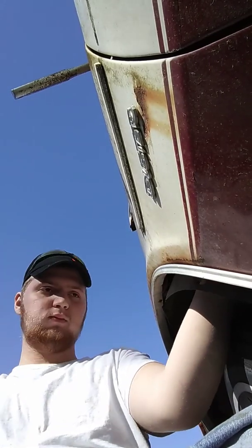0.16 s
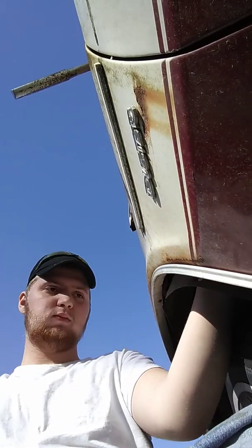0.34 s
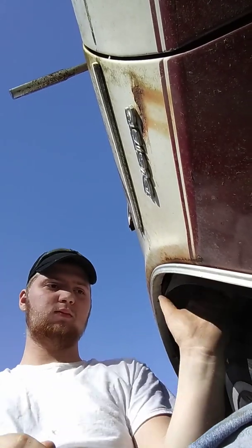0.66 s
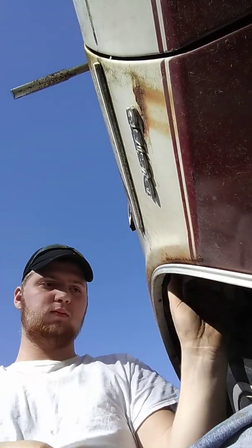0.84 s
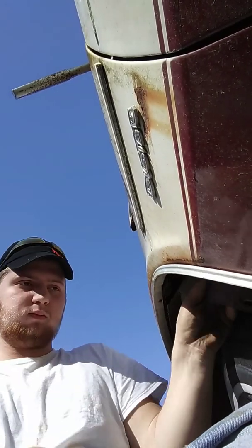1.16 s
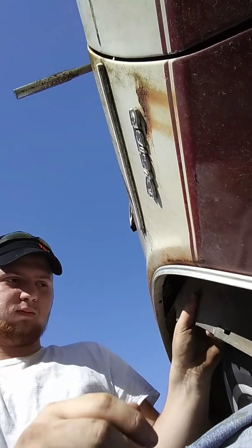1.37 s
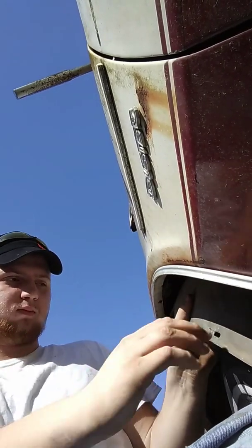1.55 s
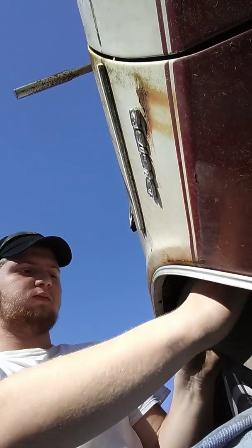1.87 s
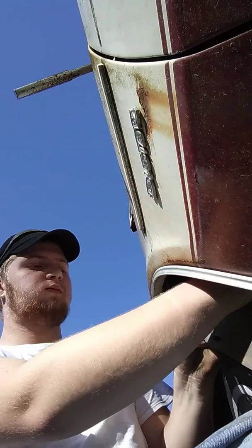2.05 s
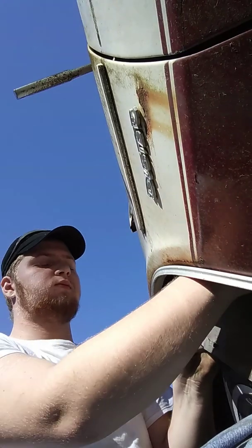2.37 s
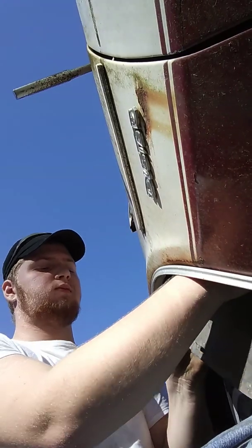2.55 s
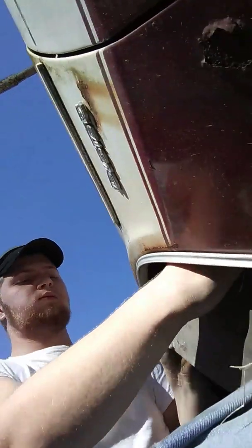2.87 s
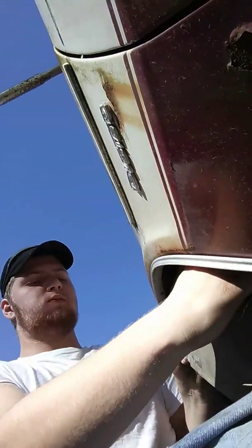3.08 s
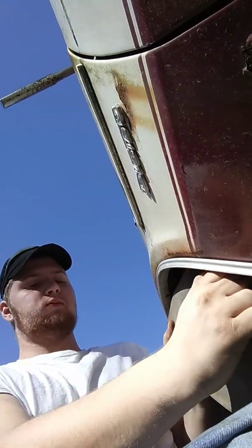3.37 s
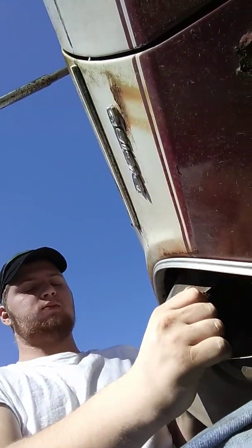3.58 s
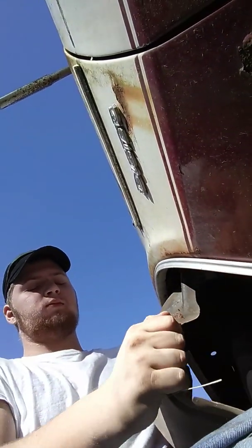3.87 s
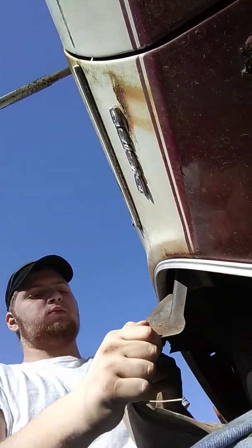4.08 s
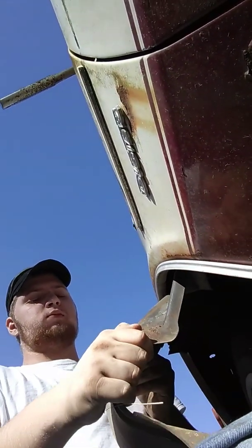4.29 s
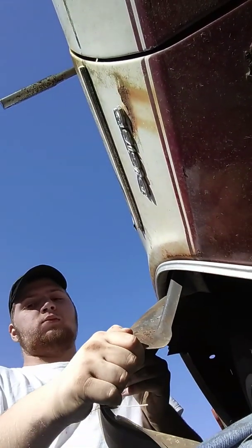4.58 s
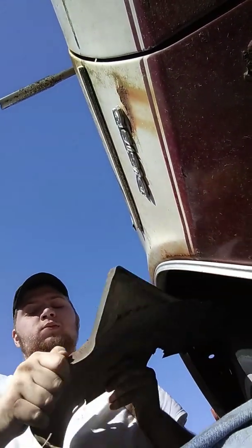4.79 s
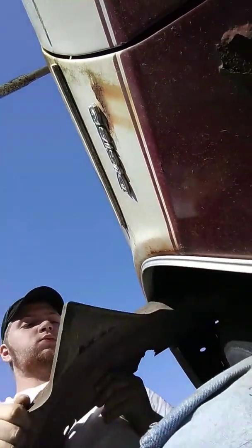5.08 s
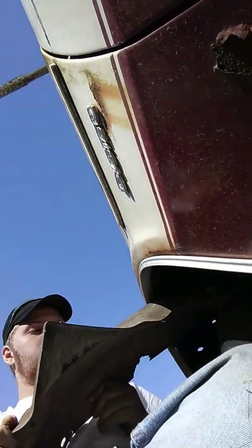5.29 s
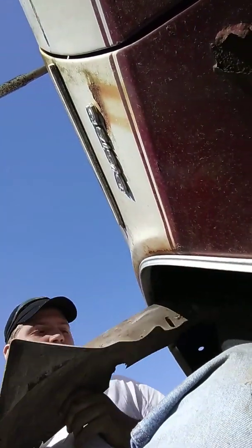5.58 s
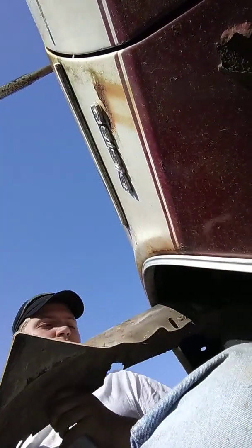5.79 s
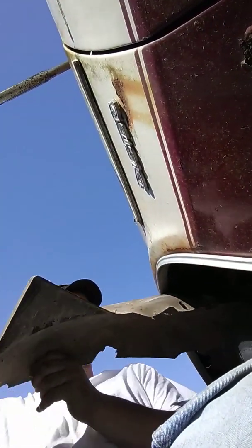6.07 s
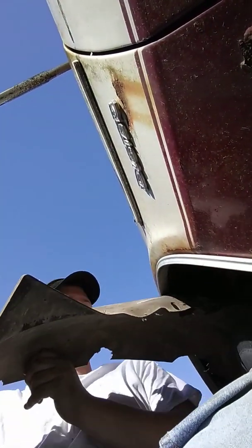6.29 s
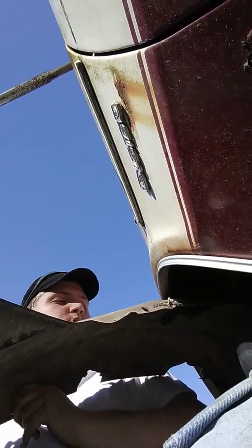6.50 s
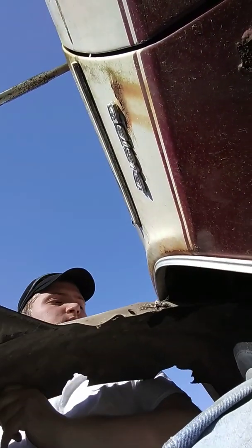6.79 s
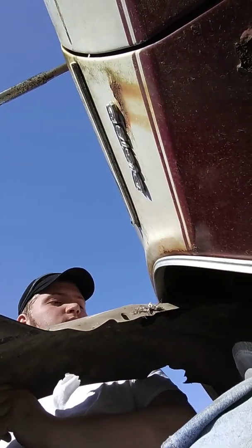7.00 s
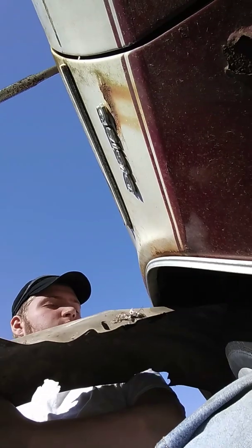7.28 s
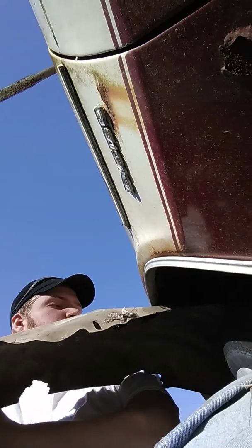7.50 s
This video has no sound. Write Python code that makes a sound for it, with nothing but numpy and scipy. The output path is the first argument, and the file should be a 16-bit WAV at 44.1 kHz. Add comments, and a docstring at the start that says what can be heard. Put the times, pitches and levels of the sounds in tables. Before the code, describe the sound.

Close to the microphone outdoors, a plastic wheel-well liner rubs and bumps softly against a steel fender. Scraping strengthens, with a sharp knock cluster and bright grit ticks, then heavy hollow thuds as it pulls loose. Its edge squawks and judders in a quick stutter, a few solid knocks follow, and dry, slightly whistling rubs finish over faint outdoor air.

```python
"""A plastic wheel-well liner, worked loose and dragged out of a car, knocks on the steel fender close by.
Blows excite damped modes of the sheet; sliding friction drives it with many tiny catches.
Its edge grinds, squawks and judders by stick-slip, whines and clangs sound at single pitches, and grit ticks.
A faint outdoor background lies beneath, and the hardest blows overload the input stage."""
import sys
import numpy as np
from scipy import signal
from scipy.io import wavfile
from scipy.ndimage import uniform_filter1d

SR = 44100
rng = np.random.default_rng(int(sys.argv[2]) if len(sys.argv) > 2 else 0)


def unload_audio(sound):
    """Save the sound as a 16-bit wav file, at the path given as the first command line argument."""
    columns = np.transpose(np.atleast_2d(sound))
    # keep every value between -1 and 1, then stretch to whole-number steps
    steps = np.round(np.clip(columns, -1, 1) * 32767)
    wavfile.write(sys.argv[1], SR, steps.astype(np.int16))


N = 337365

HZ = np.fft.rfftfreq(8192, 1 / SR)  # frequency grid of all responses
EDGE_PIVOT_HZ = 2110  # an edge pitched below it mainly clacks, one above it mainly cracks


def amp(db):
    """Level in decibels to amplitude ratio."""
    return 10 ** (np.asarray(db) / 20)


def evened(x):
    """Normalization to rms 1."""
    return x / np.sqrt(np.mean(x ** 2) + 1e-20)


def read(points):
    """Spectrum by interpolation over log frequency, as gains on the frequency grid."""
    hz, db = np.transpose(points)
    return amp(np.interp(np.log(HZ + 1), np.log(hz), db))


def add(mix, s, sound):
    """Superposition: adds a sound to the mix from time s, cut at the end of the mix."""
    part = mix[round(s * SR):][:len(sound)]
    part += sound[:len(part)]


def causal(gain):
    """Minimum-phase impulse response of energy 1: the log gain fixes the phase by a Hilbert transform."""
    log_gain = np.log(np.maximum(gain / gain.max(), 1e-5))
    circle = np.concatenate([log_gain, log_gain[-2:0:-1]])
    spectrum = np.exp(np.conj(signal.hilbert(circle)))
    taps = np.fft.ifft(spectrum).real[:len(HZ)]
    return taps / np.linalg.norm(taps)


def wander(size, rate_hz):
    """Slow random fluctuation of rms 1, interpolated between rate_hz random values a second."""
    knots = np.arange(size) * rate_hz / SR
    return evened(np.interp(knots, np.arange(size), rng.standard_normal(size)))


def sheet(colour, between_db=-1):
    """Modal superposition: strong modes stand out of a dense mass of weaker ones."""
    # resonances of the sheet and its stiff edge: [f/Hz, full width/Hz, level/dB before the colour]
    modes = [(228.2, 15, 6), (280.8, 20, 4), (364.6, 23, 3.5), (442, 16, 4), (556, 14, -1.5),
             (634.5, 50, 1.5), (800, 150, -2.5), (1310, 25, -1.5), (1865, 115, -2.5), (2310, 61, -2),
             (2430, 38, -9.5), (3250, 29, 0.5), (3860, 280, -5.5), (4730, 30, 1), (9650, 600, -2)]
    peaks = sum(amp(db) ** 2 / (1 + (2 * (HZ - hz) / width) ** 2) for hz, width, db in modes)
    return read(colour) * np.sqrt(amp(between_db) ** 2 + peaks)


def registers():
    """Band division of the sheet's response, from broad bending (thump) up to its surface (fizz)."""
    # colour of blows and of sliding: [f/Hz, relative level/dB per Hz]
    colour = [(40, -66), (110, -30), (170, -10), (230, -3), (400, 3), (650, -1), (1000, -7), (2000, -10),
              (4300, -8.5), (5800, -23.5), (8200, -32), (10500, -30), (15500, -34.5)]
    # borders between thump, clack, crack and fizz: [f/Hz]
    borders_hz = [869, 2370, 6540]
    below = [0] + [1 / (1 + (HZ / hz) ** 12) for hz in borders_hz] + [1]
    gain = sheet(colour)
    return [causal(gain * np.sqrt(abs(b - a))) for a, b in zip(below, below[1:])]


def narrow_peaks(rows):
    """Sum of peak powers, with dark valleys between them; a width is the half width at -6 dB."""
    power = sum(amp(db) ** 2 / (1 + ((HZ - hz) / width) ** 2) ** 2 for hz, width, db in rows)
    return causal(np.sqrt(power))


def asperities(size, per_s, spread_db, smooth):
    """Asperity friction: sparse random catches of uneven size over a smooth hiss."""
    sizes = amp(spread_db * np.minimum(rng.exponential(1, size), 4)) * rng.choice([-1, 1], size)
    catches = evened(sizes * (rng.random(size) < per_s / SR))
    return evened(catches + smooth * rng.standard_normal(size))


def crackle(size, per_s, spread_db, cycles, count=22):
    """Local resonance under coarse friction: catches ring spots of the surface, each at its own pitch."""
    out = np.zeros(size)
    for hz in np.geomspace(800, 15000, count):
        # the amplitude falls by a factor e in the given number of cycles
        radius, turn = np.exp(-hz / (cycles * SR)), 2 * np.pi * hz / SR
        catches = asperities(size, per_s / count * np.sqrt(hz / EDGE_PIVOT_HZ), spread_db, 0)
        spot = signal.lfilter([1, 0, -1], [1, -2 * radius * np.cos(turn), radius ** 2], catches)
        out += np.sqrt(hz) * evened(spot)
    return evened(out)


def struck(force, response):
    """Forced response by convolution, with rms 1 over its first 14 ms."""
    sound = signal.fftconvolve(force, response)[:len(force)]
    return sound / np.sqrt(np.mean(sound[:round(.014 * SR)] ** 2))


def ring(t, hz, rise_s, fall_s):
    """Damped oscillation of one mode, with rms 1 over its first 14 ms."""
    phase = 2 * np.pi * np.cumsum(hz * np.ones(len(t))) / SR
    envelope = np.exp(-t / fall_s) * (1 - np.exp(-t / rise_s))
    return struck(np.sin(phase) * envelope, [1])


def rattle(t, ring_s, well_db, well_s):
    """Contact force as decaying noise: a short burst, then reflections inside the wheel well."""
    burst = np.exp(-t / ring_s) + amp(well_db) * np.exp(-t / well_s)
    return burst * (1 - np.exp(-t / 0.00032)) * rng.standard_normal(len(t))


def air(level_db=-57.5):
    """Stationary filtered noise: a faint outdoor background."""
    # its colour: [f/Hz, relative level/dB per Hz]
    air_colour = [(50, -12), (250, 22), (700, 1), (1500, -9), (4500, -3), (9000, -23)]
    return amp(level_db) * signal.oaconvolve(rng.standard_normal(N), causal(read(air_colour)))[:N]


def sheen(uneven_db=2):
    """Narrow-band filtering: late rubs carry a thin, uneven, airy whistle in a few narrow high bands."""
    # the narrow bands: [f/Hz, half width/Hz, relative level/dB]
    high_bands = [(6320, 130, -2), (7060, 150, -2), (9000, 190, 1.5), (9460, 150, -3)]
    # strength of the noise, silent outside these times: [t/s, level/dB before the unevenness]
    level_curve = [(6.5, -72), (6.62, -59), (7.03, -59), (7.09, -66), (7.16, -55), (7.54, -55), (7.58, -74)]
    t = np.arange(N) / SR
    level_db = np.interp(t, *np.transpose(level_curve), left=-np.inf, right=-np.inf)
    noise = amp(level_db + uneven_db * wander(N, 20)) * rng.standard_normal(N)
    return signal.oaconvolve(noise, narrow_peaks(high_bands))[:N]


def whines(width_hz=110):
    """Resonant filtering: friction noise feeds one narrow mode, a rough, short whistle."""
    out = np.zeros(N)
    # friction holds one mode singing: [start t/s, end t/s, f/Hz, level/dB]
    whine_rows = [(0.268, 0.337, 1490, -49), (.81, 0.88, 4700, -53), (0.807, 0.88, 3480, -52),
                  (0.82, 0.88, 740, -41), (5.178, 5.215, 1580, -23.5), (5.497, 5.55, 1290, -19),
                  (7.275, 7.37, 2200, -37)]
    for start, end, hz, db in whine_rows:
        size = round((end - start) * SR)
        force = rng.standard_normal(size) * signal.windows.tukey(size, .5)
        sound = signal.fftconvolve(force, causal(1 / (1 + ((HZ - hz) / width_hz) ** 2)))
        add(out, start, amp(db) * sound / np.sqrt(np.mean(sound[:size] ** 2)))
    return out


def grit(low_hz=3200):
    """Impulsive release: single grains snap off as bright ticks that hardly ring."""
    out, t = np.zeros(N), np.arange(SR // 25) / SR
    response = causal(HZ ** 2 / (HZ ** 2 + low_hz ** 2))
    # grit snaps off the sheet: [t/s, peak level/dB]
    snap_rows = [(.9015, -27), (2.464, -15), (2.8144, -6), (2.754, -18), (2.877, -17), (2.943, -16),
                 (3.051, -24), (3.179, -20), (3.23, -21), (3.344, -23), (3.694, -23), (3.971, -7),
                 (4.034, -21.5), (4.4, -22), (4.528, -24), (5.05, -21), (5.121, -23), (5.2817, -13),
                 (5.666, -27)]
    for s, db in snap_rows:
        tick = signal.fftconvolve(rattle(t, 0.00096, -28, 0.011), response)
        add(out, s, amp(db) * tick / abs(tick).max())
    return out


def clangs(sharp_share=0.08, settle_s=0.008, chatter_share=0.035):
    """Damped mode of gliding pitch: the fender starts sharp, settles and chatters against the sheet."""
    out, t = np.zeros(N), np.arange(SR // 4) / SR
    # a square hit leaves the steel fender ringing: [t/s, settled f/Hz, level/dB, decay/s]
    clang_rows = [(2.578, 1290, -15, 0.011), (1.492, 2380, -32, 0.012)]
    for s, hz, db, decay_s in clang_rows:
        pitch = hz * (1 + sharp_share * np.exp(-t / settle_s) + chatter_share * wander(len(t), 800))
        add(out, s, amp(db) * ring(t, pitch, 0.003, decay_s))
    return out


def squawks(rough=0.75):
    """Stick-slip excitation: fast, uneven pulses ring the resonances of the bent edge."""
    # resonances of the edge while it is bent: [f/Hz, half width/Hz, relative level/dB]
    bent_modes = [(690, 380, 0), (1570, 190, 2), (2640, 380, -1), (3580, 200, -9), (4250, 350, -16)]
    # one curve for each squawk: [t/s, mean slip rate f/Hz, level/dB]
    squawk_curves = [
        [(5.047, 820, -32), (5.052, 850, -16.5), (5.069, 830, -17), (5.08, 750, -14.5), (5.092, 640, -28),
         (5.104, 780, -26.5), (5.114, 780, -42)],
        [(5.178, 780, -38), (5.188, 790, -17.5), (5.198, 800, -25), (5.222, 800, -23), (5.248, 780, -28)],
    ]
    out, response = np.zeros(N), narrow_peaks(bent_modes)
    for curve in squawk_curves:
        s, rate, db = np.transpose(curve)
        t = np.arange(s[0], s[-1], 1 / SR)
        turns = np.cumsum(np.interp(t, s, rate) * (1 + .065 * wander(len(t), 700))) / SR
        harmonics = sum(np.cos(2 * np.pi * k * turns) for k in range(1, 8))
        pulses = evened(harmonics * amp(2.1 * wander(len(t), 353)))
        force = pulses + rough * rng.standard_normal(len(t))
        sound = signal.fftconvolve(force, response)[:len(t)]
        add(out, s[0], evened(sound) * amp(np.interp(t, s, db)))
    return out


def judder(count=8, start_s=5.5178, gap_s=0.0081, start_db=-10, fade_db_per_s=194):
    """Regular stick-slip: evenly spaced slips weaken as the edge runs free, in rows [t/s, level/dB]."""
    return [(start_s + s, start_db - fade_db_per_s * s) for s in np.arange(count) * gap_s]


def slips(snap_hz=2600, edge_hz=1270, sweep_s=0.001097, ring_s=0.0051, bend_share=0.44, sheet_share=0.53):
    """Dispersion: each slip sends a bending wave along the edge, whose high part arrives first."""
    out, t = np.zeros(N), np.arange(SR // 6) / SR
    # colour of a slip: [f/Hz, relative level/dB per Hz]
    slip_colour = [(60, -45), (200, -19.5), (400, -5), (900, -0.5), (1300, -0.5), (1700, -5.5),
                   (2400, -5.5), (3200, -13.5), (4600, -19), (6000, -33), (15000, -40)]
    # the bent edge sticks and jumps: [t/s, level/dB before the two shares]
    slip_rows = [(5.203, -17.5), (5.2504, -11.5), (5.2917, -11.5), (5.3376, -10.5), (5.4366, -8.5),
                 (5.478, -8.5), (5.503, -7)]
    response = causal(sheet(slip_colour))
    for s, db in slip_rows + judder():
        hz = edge_hz * (1 + 0.039 * rng.standard_normal()) + snap_hz * np.exp(-t / sweep_s)
        body = struck(rattle(t, ring_s, -10.5, 0.021), response)
        add(out, s, amp(db) * (bend_share * ring(t, hz, 0.0013, ring_s) + sheet_share * body))
    return out


def grinds(responses, fade_db=8.5, fizz_db=-10):
    """Forced vibration: coarse catches drive the whole sheet; edge noise fades as the pressure lets go."""
    out = np.zeros(N)
    # the edge grinds over steel, its tilt leaning towards crack and fizz:
    # [start t/s, end t/s, thump level/dB, clack level at the start/dB, tilt/dB per register]
    grind_rows = [(0.87, 0.938, -22.5, -28.5, -7), (1.14, 1.202, -24, -36, -5),
                  (1.478, 1.507, -17.5, -27, -0.5), (2.322, 2.345, -25, -30, -3),
                  (3.812, 3.9, -13.5, -23, 1), (4.672, 4.822, -14.5, -22.5, -8),
                  (4.704, 4.774, -42, -18, -2.5), (5.198, 5.246, -31, -35, 2)]
    for start, end, thump_db, clack_db, tilt_db in grind_rows:
        size = round((end - start) * SR)
        push = asperities(size, per_s=700, spread_db=2.5, smooth=0.67)
        crunch = evened(.6 * push + crackle(size, per_s=2400, spread_db=3, cycles=3))
        edge_db = clack_db - fade_db * np.linspace(0, 1, size)
        levels_db = thump_db, edge_db, edge_db + tilt_db, edge_db + 2 * tilt_db + fizz_db
        window = signal.windows.tukey(size, .08)
        for force, db, response in zip([push, crunch, crunch, crunch], levels_db, responses):
            add(out, start, signal.fftconvolve(force * window * amp(db), response))
    return out


def strokes(swell_db=8.5, curve=1.24, ramp_s=0.027, lean_weight_db=2.5, lean_dirt_db=-12.5):
    """Speed-dependent friction: rumble, rasp and fizz swell as each stroke speeds up, then slacken."""
    # between strokes the sheet still leans on the fender and creeps: [t/s, rasp level/dB]
    lean_curve = [(0.7, -57.5), (1.1, -49.5), (1.85, -56.5), (2.1, -57), (2.7, -44), (3.95, -42.5),
                  (4.3, -51), (4.6, -52), (5.0, -37), (5.4, -41.5), (5.75, -51), (7.6, -54)]
    # one push or pull of the sheet, with its weight (rumble) and dirt (fizz), before pressure and shares:
    # [start t/s, fastest t/s, end t/s, rasp level/dB, rumble over rasp/dB, fizz over rasp/dB]
    stroke_rows = [(0.0, -0.005, 0.093, -42.5, 7.5, -12.5), (0.134, 0.17, 0.23, -46.5, 5, -10),
                   (0.25, 0.295, 0.43, -44, -3.5, -12.5), (0.56, 0.59, 0.68, -52, 3, -12),
                   (0.803, 0.84, 0.87, -42.5, 6.5, -4), (0.856, 0.93, 1.076, -38.5, 9.5, -11.5),
                   (1.129, 1.226, 1.3, -40.5, 11, -11.5), (1.287, 1.49, 1.575, -37.5, 7.5, -16),
                   (1.57, 1.64, 1.73, -46.5, 10, -9), (1.73, 1.76, 1.9, -49.5, 1.5, -4.5),
                   (1.887, 1.945, 2.07, -40, -4.5, -10.5), (2.1, 2.222, 2.35, -40.5, -1, -7),
                   (2.31, 2.4, 2.44, -38, 4, -10.5), (2.451, 2.557, 2.75, -34, 3, -11.5),
                   (2.709, 2.793, 2.933, -23, -3, -8.5), (2.87, 3.022, 3.14, -34.5, 5, -9),
                   (3.13, 3.237, 3.43, -34.5, -9, -9.5), (3.41, 3.542, 3.62, -29, 5.5, -11),
                   (3.634, 3.684, 3.78, -29.5, 2, -12), (3.75, 3.852, 4.13, -30, 6, -12.5),
                   (4.08, 4.16, 4.3, -39, 2.5, -10), (4.308, 4.35, 4.44, -40, 4.5, -12),
                   (4.509, 4.555, 4.67, -41, 7.5, -14), (4.659, 4.78, 4.85, -28, 6, -14),
                   (4.885, 4.92, 5.05, -29.5, 5, -11), (5.15, 5.273, 5.4, -32.5, 8, -15),
                   (5.406, 5.545, 5.58, -27, 7, -13.5), (5.554, 5.577, 5.85, -43, 14, -16.5),
                   (5.82, 6.068, 6.33, -38.5, -1, -11), (6.11, 6.214, 6.24, -38, 13, -20),
                   (6.312, 6.416, 6.485, -32.5, 8.5, -10.5), (6.547, 6.673, 6.83, -38, 6, -13.5),
                   (6.81, 6.97, 7.12, -39.5, 11, -16), (7.102, 7.164, 7.33, -35.5, 4, -13),
                   (7.232, 7.33, 7.56, -35, 6.5, -13), (7.597, 7.647, 7.67, -45.5, 5, -14)]
    t = np.arange(N) / SR
    lean = amp(np.interp(t, *np.transpose(lean_curve)))
    power = (amp([[lean_weight_db], [0], [lean_dirt_db]]) * lean) ** 2
    for start, fastest, end, rasp_db, weight_db, dirt_db in stroke_rows:
        on = (t > start - ramp_s / 2) & (t < end + ramp_s / 2)
        slack = np.interp(t[on], [start, fastest, end], [1, 0, 1]) ** curve
        contact = np.clip(np.minimum(t[on] - start, end - t[on]) / ramp_s + .5, 0, 1)
        colour = amp([[weight_db], [0], [dirt_db]])
        power[:, on] += contact * (colour * amp(rasp_db - swell_db * slack)) ** 2
    return np.sqrt(power)


def shifting(x, patchy_db=2.5):
    """Position-dependent modal coupling: the travelling contact favours now these modes, now those."""
    z = signal.stft(x, nperseg=512, noverlap=384)[2]
    patches = uniform_filter1d(rng.standard_normal(z.shape), size=3, axis=0)  # over frequency
    patches = evened(uniform_filter1d(patches, size=16, axis=1))  # over time
    gain = evened(amp(patchy_db * np.clip(patches, -2, 2)))
    return signal.istft(z * gain, nperseg=512, noverlap=384)[1][:N]


def rubbing(responses, clack_share=0.5, crack_share=0.49, judder_db=1.6, lumps_db=1.5):
    """Sliding friction: dirt catches thousands of times a second, under an unsteady hand."""
    pressure = evened(amp(judder_db * wander(N, 55)))
    rumble, rasp, fizz = pressure * strokes()
    fine = asperities(N, per_s=1600, spread_db=3.7, smooth=.85)
    catches = evened(fine + .75 * crackle(N, per_s=2200, spread_db=3, cycles=2.2))
    # larger grains crunch on top
    crumbs = evened(catches + .52 * asperities(N, per_s=90, spread_db=3.4, smooth=0))
    # the heavy sheet averages the catches into a soft, lumpy rumble
    lumps = evened(rng.standard_normal(N) * amp(lumps_db * wander(N, 30)))
    forces = [lumps * rumble, catches * rasp * clack_share, crumbs * rasp * crack_share, crumbs * fizz]
    return shifting(sum(signal.oaconvolve(f, response)[:N] for f, response in zip(forces, responses)))


def knocks(responses, flex_s=0.004, flex_share=0.37, body_share=0.57, hum_share=0.25, edge_share=0.56,
           mode_s=0.013, buckle_share=0.03, edge_steepness=2.43, dirt_crack_db=-0.5,
           gripped_s=5.75, grip_damping_db=-7):
    """Impact excitation: a blow flexes the sheet at one main pitch, rings its edge and shakes dirt loose."""
    out, t = np.zeros(N), np.arange(SR // 4) / SR
    # the sheet hits the fender, levels before the shares, the split of the edge and its damping:
    # [t/s, flexing f/Hz, thump level/dB, struck edge f/Hz, edge level/dB, loosened dirt level/dB]
    knock_rows = [(0.881, 620, -20.5, 3390, -20.5, -36.5), (0.901, 440, -29, 1077, -20, -36),
                  (0.926, 284, -14.5, 1037, -25, -40), (1.1345, 347, -15, 3120, -20, -56),
                  (1.171, 439, -14, 2300, -36, -51), (1.181, 400, -21, 2900, -37, -55),
                  (1.203, 460, -21.5, 1820, -35, -58), (1.245, 460, -25, 902, -41, -58),
                  (1.316, 444, -21, 1910, -33.5, -46), (1.336, 423, -23, 1490, -37, -54),
                  (1.358, 461, -18.5, 896, -30, -60), (1.412, 360, -23.5, 2320, -35, -40.5),
                  (1.476, 570, -20, 1700, -28.5, -54), (1.49, 483, -16, 2307, -21, -49),
                  (1.603, 430, -16.5, 1028, -34.5, -54), (1.63, 460, -18.5, 1014, -34.5, -58),
                  (2.332, 527, -22, 1785, -27, -54), (2.468, 646, -21, 1920, -19.5, -32),
                  (2.542, 428, -36, 4200, -41, -33), (2.577, 468, -10.5, 2400, -22, -27),
                  (2.579, 360, -22, 3600, -22, -40), (2.646, 640, -9, 1850, -19, -38),
                  (2.657, 475, -10.5, 850, -24, -33), (2.668, 300, -16, 1300, -32, -46),
                  (2.678, 390, -16, 2350, -32, -42), (2.919, 450, -12, 3230, -40, -39),
                  (2.994, 343, -22, 2700, -50, -60), (3.029, 328, -26, 3800, -35, -47),
                  (3.085, 327, -23.5, 4430, -39, -47), (3.102, 315, -24, 4300, -33, -47),
                  (3.505, 374, -27, 3830, -25.5, -31.5), (3.5193, 282, -13.5, 3900, -31, -52),
                  (3.766, 349, -11.5, 3467, -24.5, -36.5), (3.811, 422, -8, 1870, -20, -25.5),
                  (3.893, 447, -11.5, 1400, -26.5, -32), (3.971, 417, -20, 3300, -19.5, -19.5),
                  (4.049, 574, -9, 1300, -46, -59), (4.065, 520, -30, 4220, -35, -36.5),
                  (4.159, 489, -12, 1310, -21, -29.5), (4.323, 382, -24.5, 3500, -42.5, -47),
                  (4.4, 440, -37, 4300, -36, -39), (4.58, 441, -20.5, 2402, -48, -52),
                  (4.678, 387, -7, 1600, -24, -32), (4.705, 460, -30, 3850, -17, -43),
                  (4.783, 525, -8.5, 1800, -36, -56), (4.887, 394, -38, 2310, -33, -37),
                  (5.078, 580, -18, 1570, -32, -48), (5.141, 573, -13.5, 1700, -31, -59),
                  (5.567, 540, -17, 900, -32, -56), (5.675, 328.5, -6, 1200, -36.5, -46),
                  (5.86, 559, -23.5, 1055, -31, -57), (5.998, 363, -24, 1510, -38.5, -62),
                  (6.072, 375, -17, 1500, -33, -50), (6.102, 405, -8, 1290, -16, -35),
                  (6.138, 583, -13, 1440, -16, -42), (6.179, 551, -11, 1600, -15, -42),
                  (6.2, 470, -20, 1400, -33, -59), (6.253, 460, -23.5, 1970, -29, -56.5),
                  (6.285, 420, -32, 2300, -35.5, -56), (6.766, 644, -12, 900, -33, -62)]
    for s, flex_hz, thump_db, edge_hz, edge_db, dirt_db in knock_rows:
        thump = amp(thump_db)
        body = struck(rattle(t, 0.0091, -17.5, 0.054), responses[0])
        sound = thump * (flex_share * ring(t, flex_hz, 0.0044, flex_s) + body_share * body)
        # both pitches ring on: the flexing wavers as the sheet buckles, the edge chatters
        buckle = 1 + buckle_share * wander(len(t), 110)
        chatter = 1 + .018 * wander(len(t), 600)
        # once the sheet is clear, both hands grip it and damp the ring of its edge
        ringing_db = edge_db + grip_damping_db * (s > gripped_s)
        tones = [(flex_hz, buckle, hum_share * thump), (edge_hz, chatter, edge_share * amp(ringing_db))]
        for hz, waver, gain in tones:
            decay_s = mode_s * (1300 / hz) ** 0.28  # higher modes die sooner
            sound += gain * ring(t, hz * waver, 0.0014, decay_s)
        # the edge's power divides between clack and crack; loosened dirt also crackles below its fizz
        sharpness = (edge_hz / EDGE_PIVOT_HZ) ** edge_steepness
        clack = amp(edge_db) / np.hypot(1, sharpness)
        crack = np.hypot(clack * sharpness, amp(dirt_db + dirt_crack_db))
        sound += clack * struck(rattle(t, 0.0064, -14.5, 0.021), responses[1])
        sound += crack * struck(rattle(t, 0.0045, -10, 0.012), responses[2])
        sound += amp(dirt_db) * struck(rattle(t, 0.0059, -26, 0.012), responses[3])
        add(out, s, sound)
    return out


def scene():
    """Superposition of all contacts over the background, in one channel."""
    responses = registers()
    blows = knocks(responses) + clangs() + slips() + grit()
    friction = grinds(responses) + rubbing(responses) + squawks() + whines() + sheen()
    return (blows + friction + air())[None]


def record(dry, ceiling=.71, band_hz=15750):
    """Soft saturation: the input stage rounds off the largest peaks; then a low-pass limits the band."""
    clipped = dry / (1 + (dry / ceiling) ** 8) ** (1 / 8)
    lowpass = signal.firwin(401, band_hz, window=("kaiser", 9), fs=SR)
    return signal.oaconvolve(clipped, lowpass[None], "same")


dry = scene()
out = record(dry)
unload_audio(out)
```